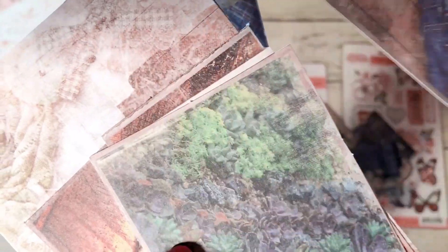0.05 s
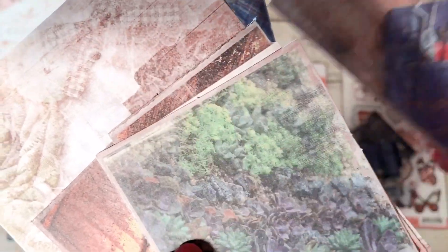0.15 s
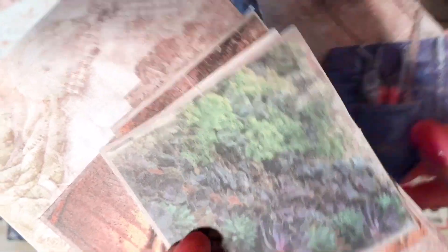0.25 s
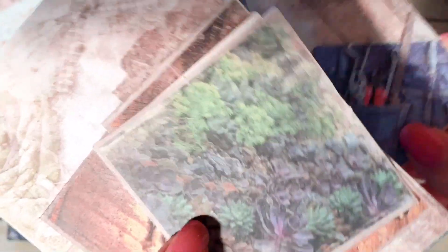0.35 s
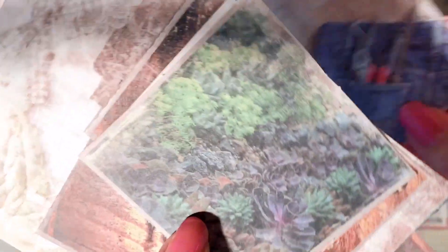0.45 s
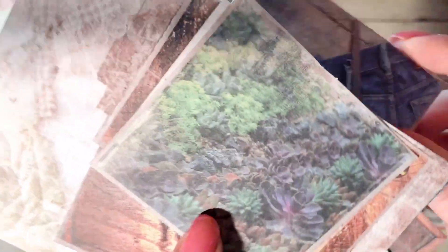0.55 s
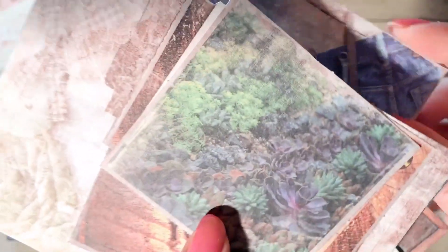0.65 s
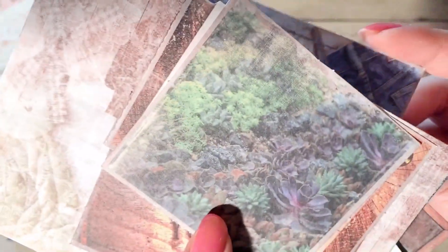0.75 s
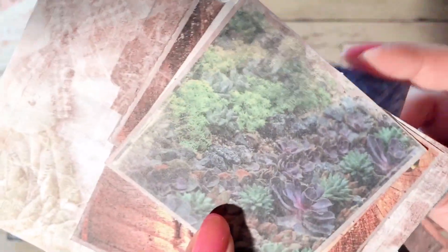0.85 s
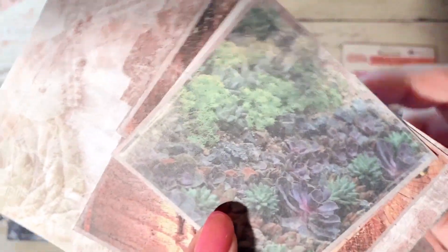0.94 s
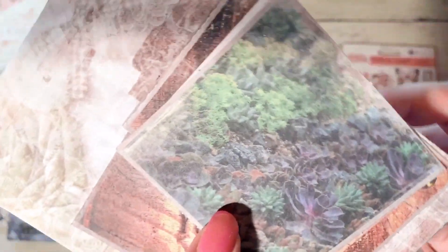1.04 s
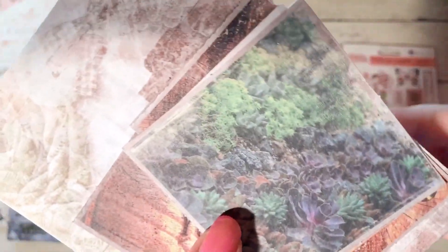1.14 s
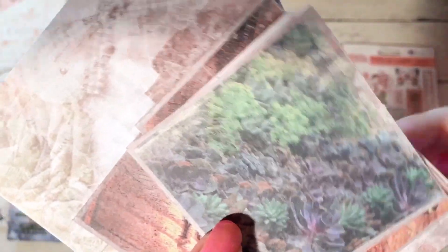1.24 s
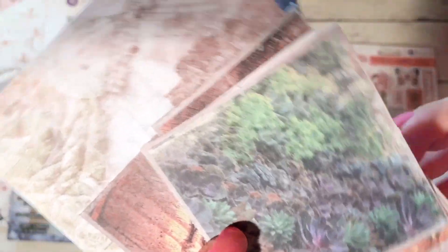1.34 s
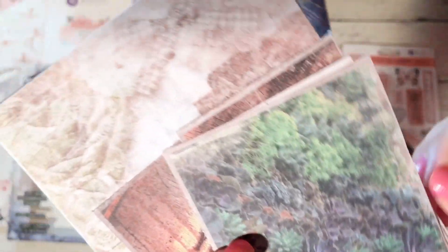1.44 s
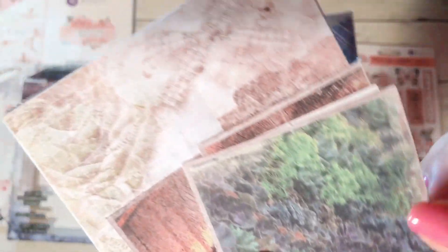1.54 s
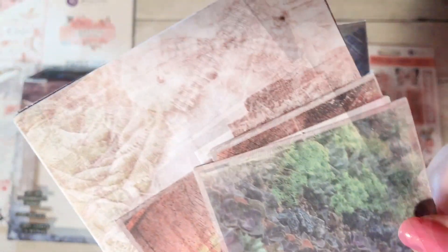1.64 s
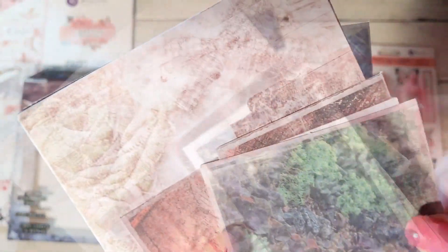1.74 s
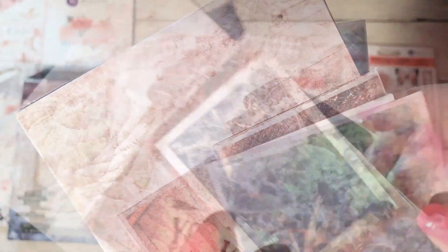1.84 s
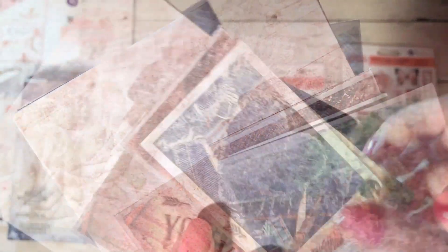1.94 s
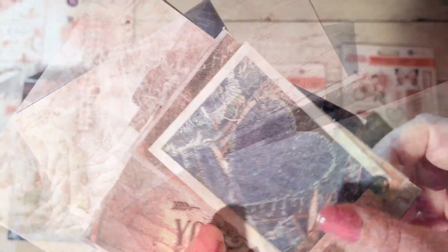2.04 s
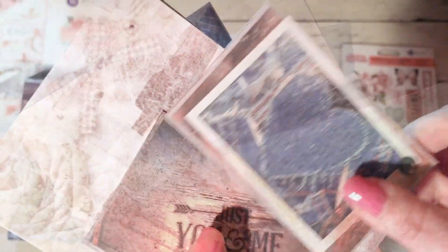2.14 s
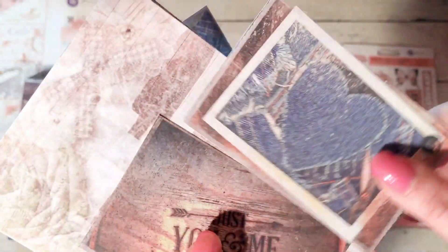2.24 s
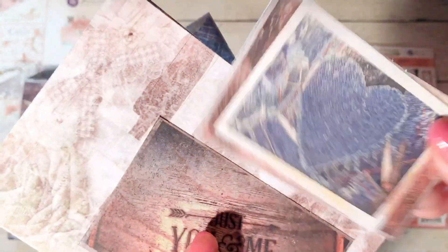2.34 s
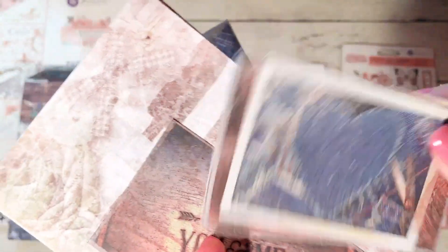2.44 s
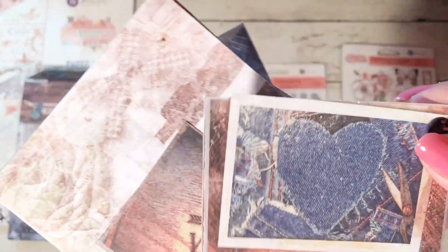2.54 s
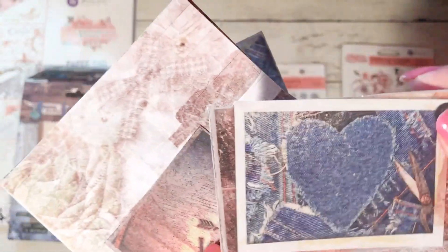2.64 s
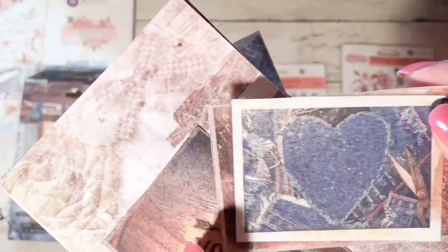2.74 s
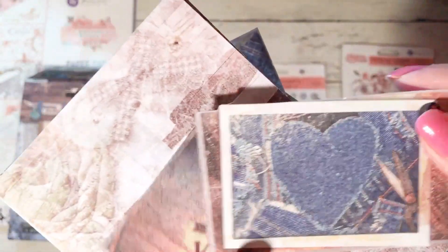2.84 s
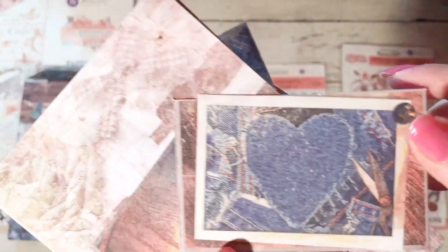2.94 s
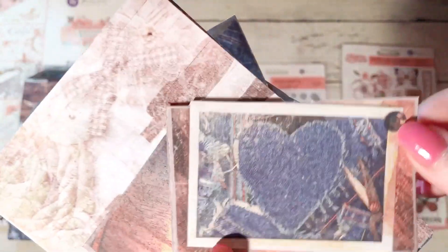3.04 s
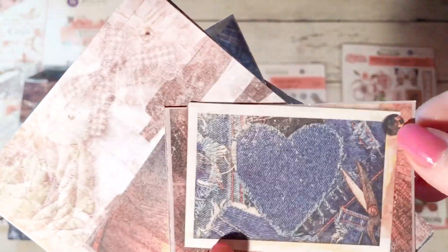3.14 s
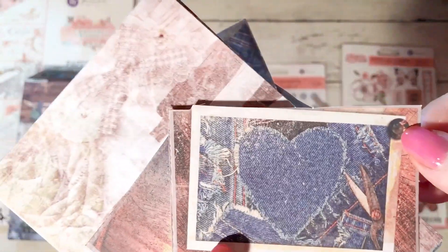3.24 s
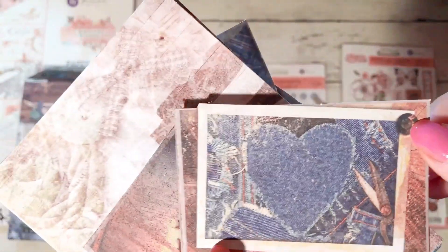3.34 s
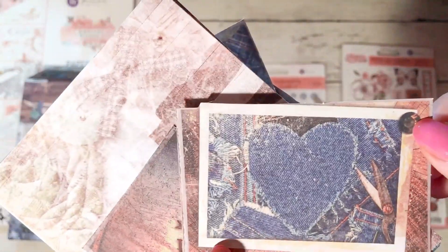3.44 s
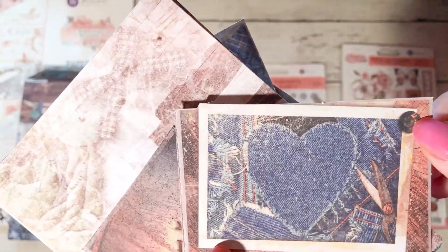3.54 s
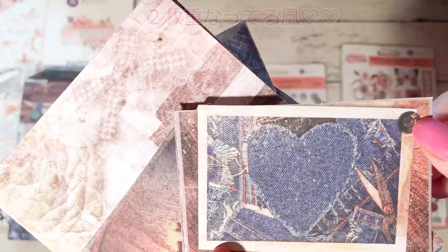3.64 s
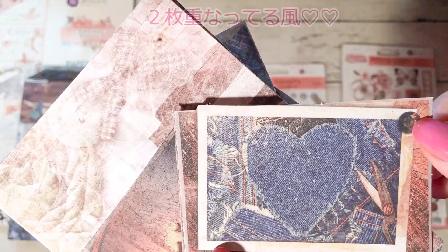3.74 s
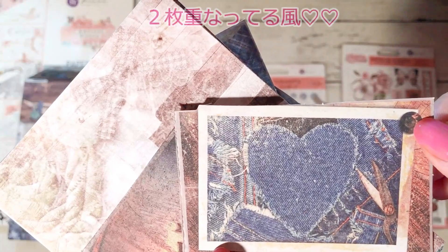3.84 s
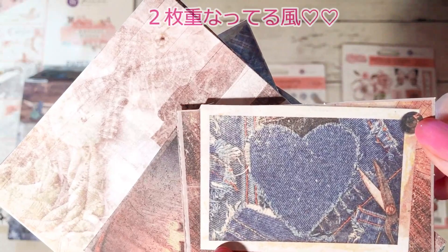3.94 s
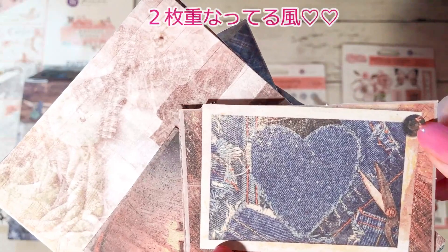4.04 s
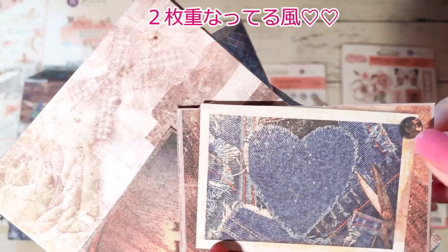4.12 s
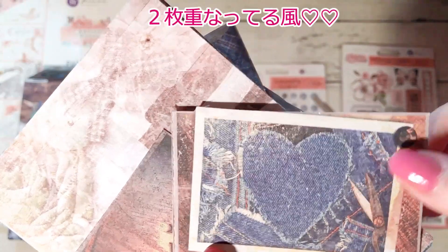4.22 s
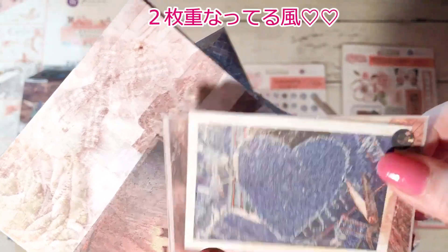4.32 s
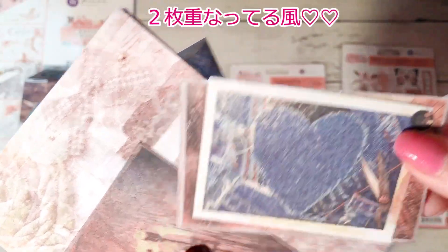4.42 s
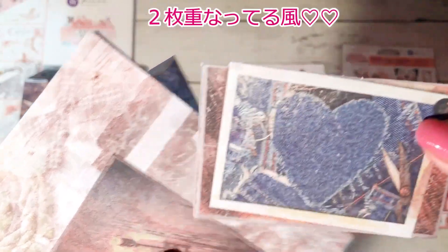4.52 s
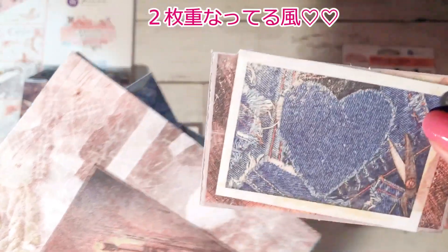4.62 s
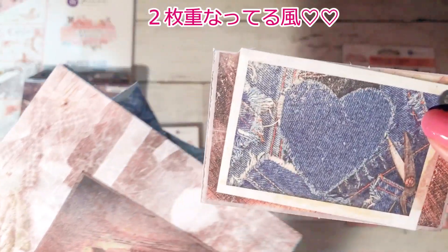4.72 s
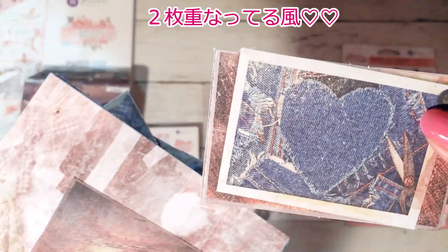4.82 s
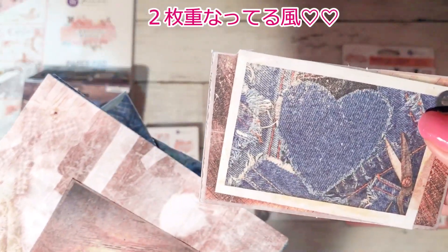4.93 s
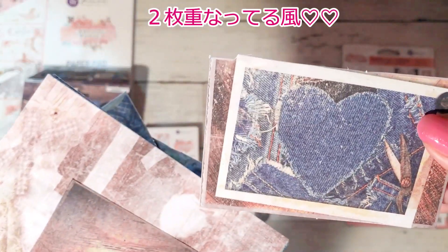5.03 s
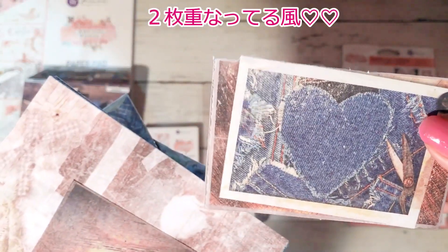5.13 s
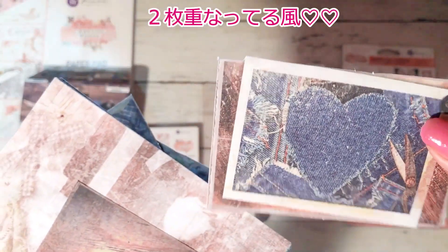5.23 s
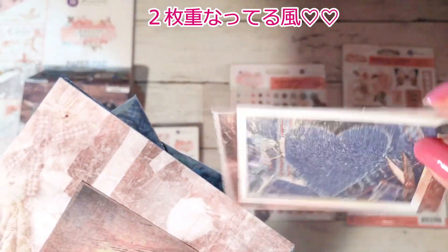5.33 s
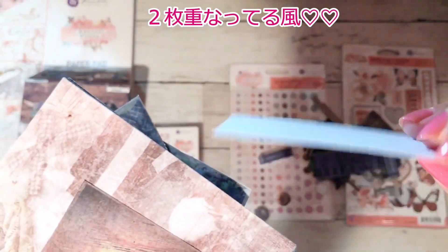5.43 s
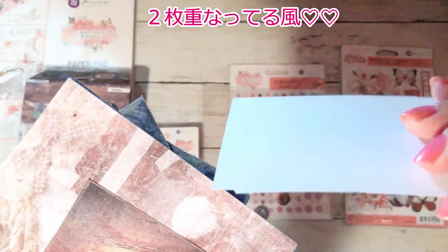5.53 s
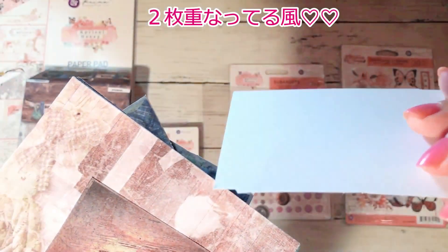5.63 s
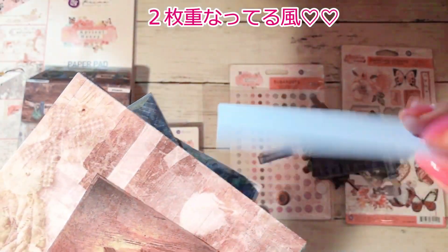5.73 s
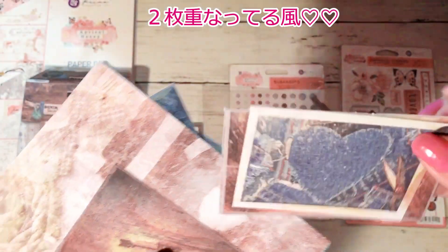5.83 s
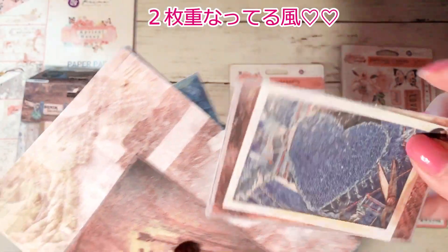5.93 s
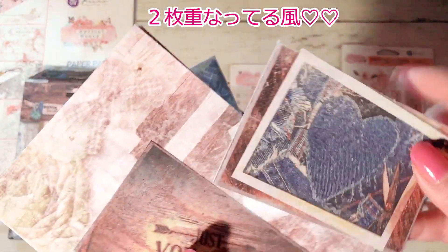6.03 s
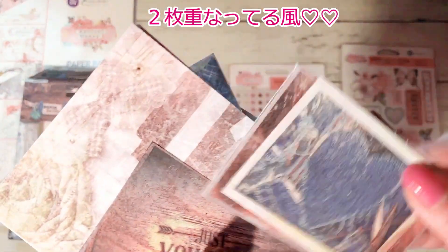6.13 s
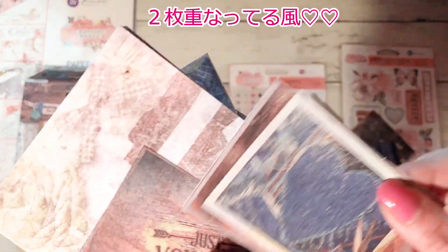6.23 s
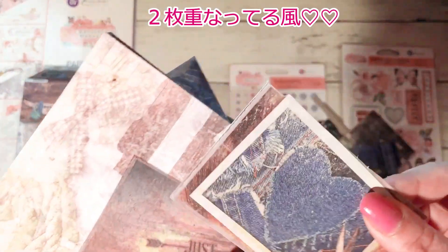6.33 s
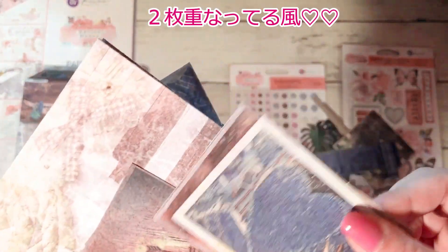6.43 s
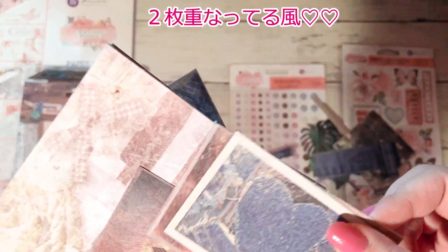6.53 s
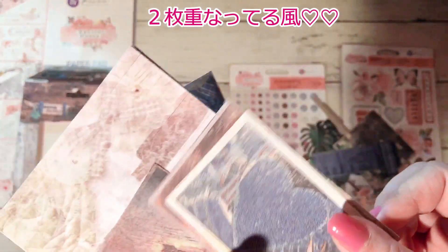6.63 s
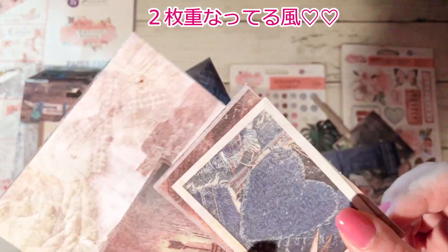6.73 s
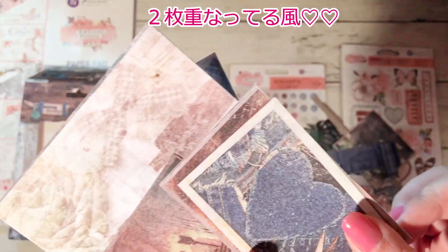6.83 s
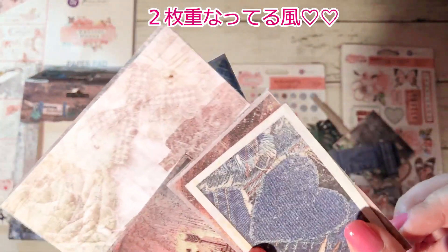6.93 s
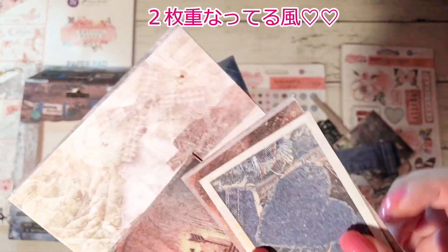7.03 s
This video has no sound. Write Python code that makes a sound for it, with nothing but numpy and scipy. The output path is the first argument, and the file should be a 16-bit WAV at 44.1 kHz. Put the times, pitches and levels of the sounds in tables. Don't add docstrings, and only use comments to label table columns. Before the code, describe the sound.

Dry, close paper handling indoors: card faces hiss over each other, corners pop with a bright click and a small dull thump, and pinched edges scuff and squeak. Activity is busy at first, peaks with hard snaps near the middle, nearly stops for over a second, then resumes with airy brushing and rough scrapes. Only low, faint room hum fills the gaps.

```python
import sys
import numpy as np
from scipy import signal
from scipy.fft import rfft, irfft, next_fast_len
from scipy.io import wavfile
from scipy.ndimage import uniform_filter1d

SR = 44100
rng = np.random.default_rng(int(sys.argv[2]) if len(sys.argv) > 2 else 0)


def amplitude_ratio(level_db):
    exponent = np.asarray(level_db, float) / 20
    return 10 ** exponent


def waveform_to_disk(signal):
    frames = np.transpose(np.atleast_2d(signal))
    scaled = np.clip(frames, -1, 1) * 32767
    samples = np.round(scaled).astype(np.int16)
    wavfile.write(sys.argv[1], SR, samples)


N = 311787
HISS_HZ, BODY_HZ, FLAP_HZ = (2900, 9500), (850, 2900), (70, 850)


def colour(hz, table):
    f, db = np.transpose(table)
    return amplitude_ratio(np.interp(np.log(hz + 1), np.log(f), db))


# (frequency [Hz], density [dB per Hz])
CARD_COLOUR = [(180, -2.5), (300, 7.5), (563, -0.5), (665, -0.5), (812, -2.5), (942, 0.5), (1060, 2.5),
               (1230, 3), (1710, 2.5), (2230, 2.5), (2680, -2.5), (5290, 1.5), (8410, 1.5), (10400, -4.5),
               (15800, 3)]


def card(hz):
    return colour(hz, CARD_COLOUR)


def shaped(x, gain_at):
    size = next_fast_len(len(x))
    hz = np.fft.rfftfreq(size, 1 / SR)
    y = irfft(rfft(x, size) * gain_at(hz), size)[:len(x)]
    return y / np.sqrt(np.mean(y ** 2))


def band(hz, lo, hi):
    return 1 / np.sqrt((1 + (lo / (hz + 1)) ** 8) * (1 + (hz / hi) ** 8))


def resonance(hz, centre_hz, sharp):
    return 1 / (1 + 1j * sharp * (hz / centre_hz - centre_hz / (hz + 1)))


def walk(rate_hz):
    hold = int(SR / rate_hz)
    steps = np.repeat(rng.standard_normal(N // hold + 1), hold)
    return 1.5 * uniform_filter1d(uniform_filter1d(steps, hold), hold)[:N]


def add(out, s, sound):
    i = int(max(s, 0) * SR)
    out[i:i + len(sound)] += sound[:N - i]


def slips(count):
    size_db = 2.5 * np.minimum(rng.exponential(size=count), 3.5)
    return rng.standard_normal(count) * amplitude_ratio(size_db)


def bending(x, patchy_db):
    _, _, z = signal.stft(x, nperseg=256)
    patches = uniform_filter1d(rng.standard_normal(z.shape), size=2, axis=0)
    patches = uniform_filter1d(patches, size=18, axis=1)
    return signal.istft(z * amplitude_ratio(patchy_db * patches / patches.std()), nperseg=256)[1][:len(x)]


GLIDES = [(0.0, 0.042, -43, -56, -11), (0.33, 0.39, -51.5, -70.5, 4.5), (0.608, 0.622, -53.5, -49, -4),
          (0.728, 0.765, -53, -46, -0.5), (0.765, 0.8, -46.5, -49, -1.5), (0.8, 0.83, -49.5, -58.5, 2),
          (0.83, 1.014, -53.5, -47, -4), (1.014, 1.08, -46.5, -61, -3.5), (1.29, 1.325, -59, -58.5, -2),
          (2.145, 2.186, -51, -46, -9), (2.186, 2.24, -46, -47, -5), (2.24, 2.33, -49, -48, -7),
          (2.33, 2.428, -47.5, -51, -6), (2.428, 2.49, -52, -70, -15), (2.9, 2.941, -50.5, -46, 0),
          (2.941, 2.993, -43, -71, -2), (6.597, 6.64, -55.5, -54, -3), (6.64, 6.711, -50.5, -47.5, -6.5)]
CREEPS = [(1.65, 1.756, -72, -65, -4), (1.764, 2.004, -74, -64.5, -5), (2.07, 2.125, -72, -60, -6),
          (2.655, 2.682, -71, -60.5, -1.5), (3.23, 3.27, -74, -66, -5), (3.27, 3.416, -66, -63, 0),
          (3.424, 3.47, -55.5, -73, -2.5), (4.195, 4.33, -69, -63, -1.5), (4.33, 4.38, -58.5, -63.5, -12),
          (5.6, 5.68, -62, -73.5, -2), (6.745, 6.755, -56, -72, 1), (6.765, 6.809, -68, -60, -0.5),
          (6.809, 6.86, -60, -65, 2), (6.865, 6.895, -61, -62, 2), (6.895, 6.925, -66, -66, 5),
          (2.6, 2.655, -70, -71, 1.5), (2.7, 2.745, -71, -68, 1.5)]
DRAGS = [(0.42, 0.476, -57.5, -50, -6.5), (1.09, 1.122, -66, -54.5, -0.5), (1.122, 1.26, -54.5, -55.5, 0.5),
         (2.81, 2.9, -59.5, -49.5, -3), (3.08, 3.101, -49, -49, -7), (3.101, 3.17, -47.5, -62, -5),
         (4.398, 4.415, -47.5, -49, -9), (4.421, 4.45, -47, -50, -11), (4.45, 4.478, -50, -51, -13),
         (6.004, 6.04, -52, -52.5, -9), (6.06, 6.135, -54, -58, -5), (6.146, 6.155, -49, -46, -1),
         (6.19, 6.278, -44, -50.5, -3), (6.278, 6.303, -50.5, -48.5, -3.5), (6.34, 6.43, -55.5, -64, 4),
         (6.452, 6.485, -53.5, -53, -4), (6.488, 6.53, -49, -47, -10), (6.535, 6.597, -54, -55.5, -7.5)]
BRUSHES = [(0.275, 0.285, -65, -65, -2), (5.19, 5.3, -64, -54, -12), (5.305, 5.388, -52, -48, -12),
           (5.388, 5.464, -44.5, -63.5, -6), (5.47, 5.476, -59, -59, -16), (5.53, 5.554, -59, -51, -7),
           (5.554, 5.6, -49, -60.5, -5.5), (5.786, 5.802, -66, -54, -5), (5.802, 5.85, -54, -72, -8),
           (5.91, 5.948, -75, -55.5, -10), (5.966, 6.004, -66, -49.5, -11), (6.158, 6.2, -41.5, -42.5, -10),
           (6.925, 6.98, -62, -60, 0.5), (6.98, 7.025, -64, -62, 0.5), (7.03, 7.07, -58, -55, -2.5)]
SHAKES = [
    (0.308, 0.33, -54, -54, 2.5),
    (0.412, 0.42, -50, -59, 0),
    (0.63, 0.675, -63, -68, 2.5),
    (1.28, 1.3, -62.5, -59.5, -12),
    (2.558, 2.568, -39, -66, -6),
    (2.568, 2.6, -62, -72, -9),
    (2.803, 2.82, -61, -58, 4),
    (3.0725, 3.08, -52, -50, 2),
    (6.335, 6.35, -54.5, -55, -7),
    (0.392, 0.405, -68, -62, 5),
]


def pressure():
    silent_db, edge_db = -120, 25
    # (strokes, fine top [dB] and low flap [dB] against the hiss, attack [ms], release [ms])
    contacts = [(GLIDES, -9.5, -15, 20, 22), (CREEPS, -10.5, -8, 15, 42), (DRAGS, -22, -11, 10, 13),
                (BRUSHES, -1.2, -13, 12, 25), (SHAKES, -6, 6.2, 7, 16)]
    t, out = np.arange(N) / SR, np.full((4, N), float(silent_db))
    for strokes, top_db, flap_db, attack_ms, release_ms in contacts:
        for touch, lift, touch_db, lift_db, body_db in strokes:
            times = [touch - 3 * attack_ms / 1000, touch, lift, lift + 3 * release_ms / 1000]
            db = np.interp(t, times, [touch_db - 3 * edge_db, touch_db, lift_db, lift_db - 3 * edge_db])
            strongest = db > out[0]
            out[:, strongest] = db[strongest] + np.array([[0], [body_db], [top_db], [flap_db]])
    return uniform_filter1d(out, size=200, axis=1)


def rings(hz, modes):
    extra_width_hz = 140
    return 0.77 + sum(amplitude_ratio(db) / (1 + ((hz - f) / (width + extra_width_hz)) ** 2) for f, width, db in modes)


# (time [s], [(frequency [Hz], width [Hz], level [dB])])
HELD_RINGS = [(0, [(1880, 37, 3), (5630, 91, -13)]), (.25, [(4450, 120, -5), (8000, 46, -22)]),
              (.41, [(3400, 63, 6), (5300, 39, -15), (7100, 33, -13)]), (.6, [(3420, 62, 5)]),
              (.7, [(2200, 250, 1.5), (3200, 39, -5), (1300, 130, -16)]), (.83, [(2300, 120, 1.5),
              (3400, 60, -6)]), (1.07, [(2250, 120, -3), (5100, 130, -1), (6230, 78, -10), (7640, 40, -4)]),
              (1.6, [(2210, 210, 7), (4800, 190, -10)]), (2.06, [(2280, 48, -8), (2920, 40, -8),
              (4300, 92, -8)]), (2.8, [(4800, 500, -7), (7740, 41, -4)]), (3.0, []), (4.1, [(2400, 81, -7),
              (6120, 240, -4)]), (4.38, [(4500, 400, -3), (7200, 200, 2)]), (4.436, [(3900, 100, 2),
              (4950, 100, 4), (7400, 150, 2), (2000, 60, -4)]), (5.1, [(1940, 82, -22), (7500, 100, -21)]),
              (5.7, [(4340, 170, -17), (5400, 110, -20)]), (6.4, [(4740, 540, -6), (7400, 160, -18)]),
              (6.73, [(2300, 300, -4), (5500, 300, -8)])]


def sliding():
    out, grip, levels = np.zeros(N), np.clip(walk(60), -1.5, 1.5), pressure()
    ranges = (HISS_HZ, BODY_HZ, (HISS_HZ[1], SR), FLAP_HZ)
    flicker_settings = ((2.44, 0.61), (2.5, 0.65), (3.8, 0.17), (0.78, 2.4))
    flicker = [shared_db * grip + own_db * walk(30) for shared_db, own_db in flicker_settings]
    fibres = slips(count=N)
    ends = [s for s, _ in HELD_RINGS[1:]] + [N / SR]
    for (start, modes), end in zip(HELD_RINGS, ends):
        at = np.arange(max(int(start * SR) - 70, 0), min(int(end * SR) + 70, N))
        fade = signal.windows.tukey(len(at), 280 / len(at))
        for (lo, hi), db, flicker_db in zip(ranges, levels, flicker):
            layer = shaped(fibres[at], lambda hz: card(hz) * rings(hz, modes) * band(hz, lo, hi))
            out[at] += layer * fade * amplitude_ratio(db[at] + flicker_db[at])
    return bending(out, patchy_db=2.0)


# (frequency [Hz], density [dB per Hz])
ROOM_COLOUR = [(15, -52), (25, -65), (48, -2.5), (145, -1), (195, -2), (354, -5.5), (503, -6),
               (1190, -14.5), (1560, -17.5), (1740, -17), (2610, -20), (12200, -26.5), (16000, -30.5)]


def room():
    hum = shaped(rng.standard_normal(N), lambda hz: colour(hz, ROOM_COLOUR))
    return bending(hum, patchy_db=1.53) * amplitude_ratio(-61.5 + 0.55 * walk(2.46))


CRISP_SNAPS = [(0.0114, -38.5, -12.5, 1300, 234), (0.1974, -50, -11, 1160, 121),
               (0.602, -29, -17.5, 3330, 523), (2.1893, -37, -47, 4250, 275), (2.2242, -45, -32, 2310, 466),
               (2.7575, -38, -20, 4000, 781), (2.7639, -30.5, -22, 4060, 326),
               (2.7678, -24, -19, 3700, 799), (2.7839, -30, -9.5, 1380, 314), (2.792, -33, -7.5, 1140, 443),
               (3.068, -40, -8, 1860, 470), (3.0803, -31.5, -9, 1500, 790), (4.115, -47, -14, 2300, 258),
               (6.7395, -45.5, -16, 1070, 210), (0.097, -51, -4, 1500, 400)]
DULL_SNAPS = [(0.2995, -25, -12, 1490, 250), (0.407, -32, -10.5, 3430, 630), (0.4718, -38, -25, 3500, 412),
              (0.6165, -35.5, -20, 3460, 233), (0.8698, -33.5, -16.5, 2310, 412),
              (0.8864, -33, -18.5, 1880, 423), (0.982, -34, -10.5, 3700, 337),
              (1.0249, -36.5, -19.5, 2090, 288), (1.264, -26, -15.5, 1950, 190),
              (2.5549, -30, -12.5, 1310, 267), (2.7776, -40, -1.5, 1110, 600),
              (2.8013, -39, -15, 2040, 366), (3.0855, -35.5, -12, 1300, 218),
              (3.2121, -54.5, -3.5, 1170, 116), (5.796, -49.5, -19, 1820, 579),
              (6.1409, -23, -29, 4100, 345), (6.9416, -40, -16, 2480, 184), (2.5483, -16.5, -24, 3700, 500)]


def snaps():
    crisp_treble_db, dull_treble_db = -6, -17.5
    travel_ms = 2.4
    bounce_db, first_slip = 3.5, 2.6
    out, size = np.zeros(N), 4096
    hz = np.fft.rfftfreq(size, 1 / SR)
    root_khz = np.sqrt(hz / 1000)
    letting_go = np.exp(-np.arange(160) / SR / 0.00038)
    rows = [(*r, crisp_treble_db) for r in CRISP_SNAPS] + [(*r, dull_treble_db) for r in DULL_SNAPS]
    chance = rng.random((len(rows), 2, 9))
    for (s, db, bass_db, ring_hz, flex_hz, treble_db), (gap, sign) in zip(rows, chance):
        path = 1 + np.cumsum(np.r_[0, .25 + .9 * gap[1:]])[:, None]
        turn = 4 * np.pi * travel_ms * path * root_khz
        loss_db = -(path - 1) * (3.7 + 2.6 * root_khz) - bounce_db * (path > 1)
        wave = np.sum(np.sign(sign - .5)[:, None] * amplitude_ratio(loss_db) * np.exp(-1j * turn), axis=0)
        ragged = first_slip + rfft(slips(count=len(letting_go)) * letting_go, size)
        crack = (1 + 2.6 * resonance(hz, ring_hz, sharp=5)) * card(hz) * band(hz, 900, ring_hz + 1500)
        treble = card(hz) * band(hz, 5000, SR) / (1 + (hz / 10000) ** 6)
        thud = (0.34 + resonance(hz, flex_hz, sharp=4.2)) * band(hz, 76, 1080)
        parts = ((crack * ragged, 0), (thud, bass_db + 7.0), (treble * ragged, treble_db + 5.5))
        for gain, part_db in parts:
            part = irfft(wave * gain, size)[:3000]
            add(out, s + .0001, amplitude_ratio(db + part_db) * part / np.abs(part).max())
    return out


# (time [s], peak [dB], frequency [Hz], fade [cycles])
KNUCKLE_BUMPS = [(2.5495, -29, 1300, 0.9), (0.045, -39.5, 212, 1.1), (0.098, -36, 207, 0.66),
                 (0.101, -44, 113, 0.99), (1.276, -41, 101, 0.6), (2.386, -41, 276, 0.9),
                 (2.788, -42, 93, 0.84), (6.157, -44.5, 340, 1.1), (6.334, -40.5, 135, 0.47),
                 (6.952, -45, 190, 0.6), (0.033, -38, 230, 0.55), (0.61, -46, 107, 0.74),
                 (3.089, -46.5, 136, 1.2), (0.6045, -44, 750, 1.2), (0.983, -40, 700, 1.2),
                 (2.386, -46, 600, 0.8), (2.578, -50, 330, 1), (2.773, -38, 480, 1.2),
                 (2.79, -38, 420, 1.5), (3.072, -42, 600, 1.2), (5.558, -48, 880, 2.2),
                 (5.568, -48, 760, 2.2), (5.578, -50, 670, 2), (2.561, -38, 271, 1.2),
                 (2.554, -33.5, 420, 1.8), (3.082, -39, 310, 1.2), (0.302, -43, 750, 1.2),
                 (6.33, -44.5, 257, 1.5), (0.0203, -45, 68, 0.79)]


def bumps():
    out, t = np.zeros(N), np.arange(4000) / SR
    for s, db, hz, fade_cycles in KNUCKLE_BUMPS:
        part = hz * t / fade_cycles
        add(out, s, amplitude_ratio(db + 7) * np.sin(2 * np.pi * hz * t) * part * np.exp(-part))
    return out


SCUFFS = [(0.1092, -46.5, -2, 3210, 21), (0.6803, -41, -32, 1110, 17), (1.264, -27, -15, 2140, 9.6),
          (2.514, -32, -1, 4600, 37), (2.7575, -25.5, -18, 3980, 14), (2.7656, -37, -25, 4020, 14),
          (2.7695, -26, -29, 1150, 8), (2.7845, -26, -30, 1130, 10.4), (5.3047, -33, -9, 2160, 17),
          (5.47, -54, -2, 4840, 14), (5.8547, -40.5, 0, 2410, 11.5), (5.8885, -46, 4, 1050, 14),
          (5.9404, -45, -14, 4280, 13), (6.047, -26.5, -26, 1960, 9.3), (6.136, -30, -28, 1900, 7),
          (6.234, -25.5, -28, 4200, 14), (6.349, -27.5, -28, 4430, 15), (6.8119, -36.5, -3, 1140, 11.5),
          (4.4, -32, -15, 7100, 6), (6.3068, -24, -26, 6000, 24), (6.047, -30, -20, 5500, 9),
          (2.813, -36, -20, 4500, 8)]
SQUEAKS = [(6.308, -19, -40, 1250, 24), (6.305, -22, -40, 3900, 23), (0.6855, -36, -40, 1200, 6),
           (4.4175, -26, -40, 3900, 17), (4.472, -31, -30, 4950, 11), (1.0235, -31, -40, 2090, 7),
           (1.148, -36, -40, 1180, 40), (6.065, -36, -40, 4500, 22), (6.159, -28, -40, 4400, 20),
           (6.35, -35, -40, 1500, 10), (0.711, -40, -40, 1500, 8), (2.255, -33, -40, 1500, 25),
           (2.355, -35, -40, 1950, 15), (2.89, -33, -40, 1300, 20), (6.639, -34, -40, 2460, 20),
           (4.258, -42, -40, 1180, 10), (2.765, -24, -40, 4100, 8), (0.555, -49, -40, 2400, 12),
           (0.603, -32, -40, 3400, 5), (1.1, -40, -40, 2200, 90)]


def scuffs():
    scuff_base, squeak_base = 0.35, 0.08
    out, t = np.zeros(N), np.arange(4000) / SR
    rows = [(*r, scuff_base) for r in SCUFFS] + [(*r, squeak_base) for r in SQUEAKS]
    for s, db, top_db, ring_hz, ms, base in rows:
        def sheet(hz):
            return card(hz) * band(hz, 590, HISS_HZ[1]) * abs(base + resonance(hz, ring_hz, sharp=5.6))

        fibres = slips(count=len(t))
        drag = shaped(fibres, sheet)
        drag += amplitude_ratio(top_db - 6.0) * shaped(fibres, lambda hz: band(hz, HISS_HZ[1], SR))
        part = t / (ms / 1000)
        add(out, s, amplitude_ratio(db - 15.0) * drag * np.tanh(part / 0.29) * np.exp(-part ** 5))
    return out


RIFFLE_TICKS = [
    (3.0928, -33, 7100),
    (3.0988, -24.5, 5500),
    (3.1018, -25, 6500),
    (3.1068, -27.5, 6300),
    (3.1137, -27, 6800),
    (3.118, -35, 7200),
]
CRACKLE = [(2.5497, -18, 8400), (3.0818, -29, 8000), (3.0822, -31, 4200), (3.0872, -31, 5800),
           (3.1158, -35, 4000), (3.0692, -38, 5000), (0.4085, -38, 7500), (2.5572, -34, 8500),
           (2.7795, -36, 8000), (2.7855, -25, 4600), (2.7666, -23, 4200), (2.793, -36, 6000),
           (6.1245, -38, 4000), (6.192, -32, 4500), (6.8125, -42, 4000), (6.865, -45, 2200),
           (6.8905, -44, 3000), (6.922, -50, 1500), (6.964, -44, 1800), (6.972, -46, 5200),
           (1.2012, -38, 2200), (2.0914, -46, 2300), (2.215, -37, 2200), (2.366, -38, 1200),
           (4.2036, -49, 2300), (4.3645, -46, 5500), (4.4805, -38, 5000)]


def ticks():
    out, t = np.zeros(N), np.arange(-20, 21) / SR
    for s, db, hz in RIFFLE_TICKS + CRACKLE:
        add(out, s, amplitude_ratio(db) * np.cos(2 * np.pi * hz * t) * np.exp(-(t * hz / .7) ** 2))
    return out


def scene():
    cards = sliding() + snaps() + scuffs() + ticks() + bumps()
    t = np.arange(6000) / SR
    tail = rng.standard_normal(len(t)) * amplitude_ratio(-37.0 - 60 * t / 0.054) * (t > .002)
    return (cards + signal.fftconvolve(cards, tail)[:N] + room())[None]


def top_cut(x):
    return signal.sosfilt(signal.butter(12, 16680, fs=SR, output="sos"), x)


def record(dry):
    low_pass = signal.ellip(10, .2, 42, 15850, fs=SR, output="sos")
    soft = signal.sosfilt(low_pass, dry)
    return top_cut(soft)


dry = scene()
out = record(dry)
waveform_to_disk(out)
```